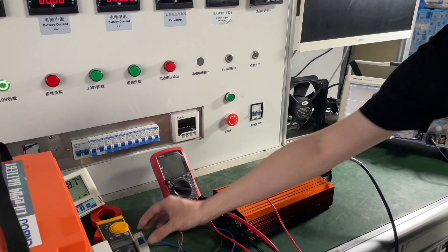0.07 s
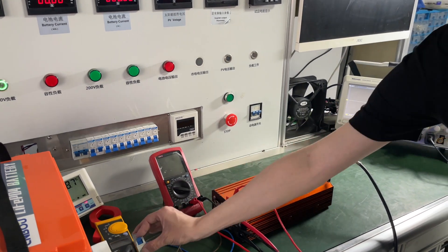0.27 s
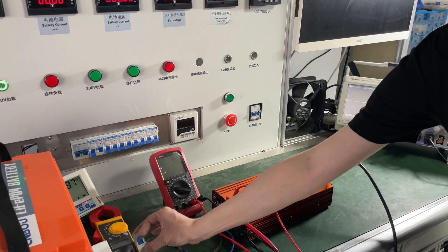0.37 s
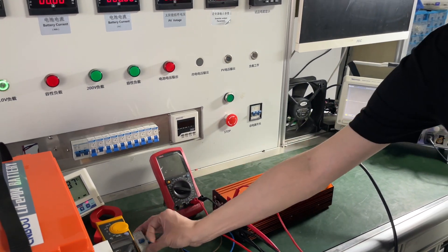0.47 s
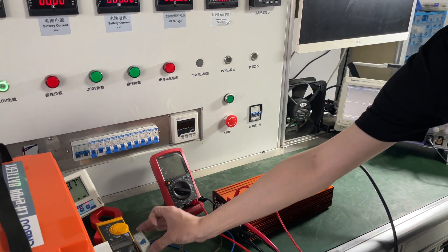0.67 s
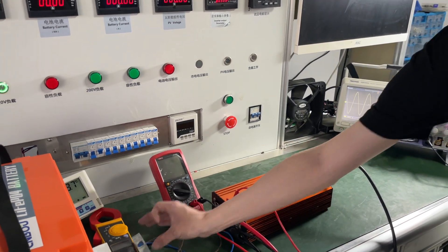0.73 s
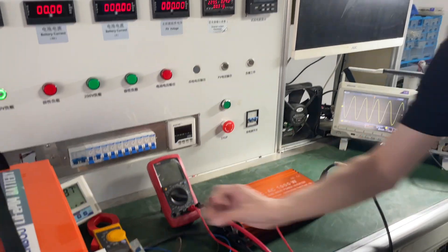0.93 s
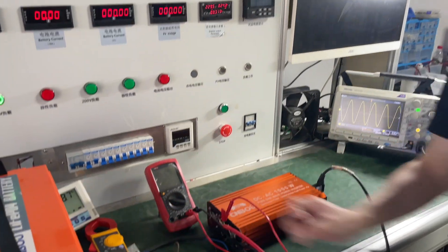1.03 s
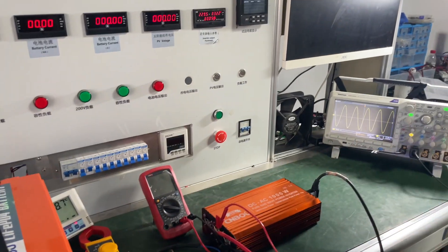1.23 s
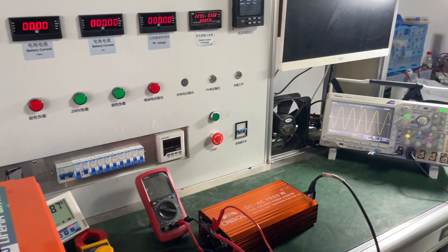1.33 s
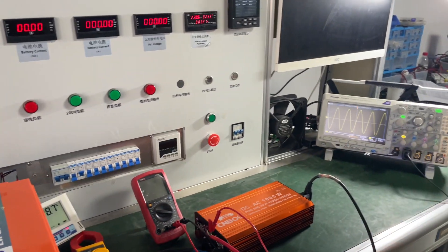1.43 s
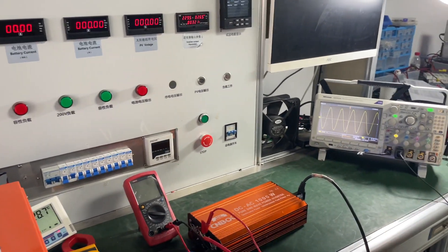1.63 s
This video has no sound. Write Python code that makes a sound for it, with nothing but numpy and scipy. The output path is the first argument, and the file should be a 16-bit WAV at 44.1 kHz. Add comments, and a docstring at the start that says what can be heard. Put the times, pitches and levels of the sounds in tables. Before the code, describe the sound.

One loud, bright electrical contact snap with a brief ringing tail, above constant fan whine and hum.

```python
"""A sharp electric snap in a hard room, a soft bench thump under it, over whining, rushing cooling fans.
The live contact cracks seven times in 6 ms: spikes and noise bursts that ring the small parts around it.
Band-split noise makes the room's tail, damped sines the bench and the faint lingering metal.
Wandering sines make the fan whine and mains hum, flickering noise the air; shaped noise makes
a few faint far ticks and, late on, the soft brush of a sleeve."""
import sys
import numpy as np
from scipy import signal
from scipy.fft import rfft, irfft
from scipy.io import wavfile

SR = 44100
rng = np.random.default_rng(int(sys.argv[2]) if len(sys.argv) > 2 else 0)


def digitize_waveform(pressure):
    """Quantize a signal to 16-bit integers and store it at the path in sys.argv[1].

    Rows of a 2-D input are taken as channels; values are limited to [-1, 1].
    """
    field = np.atleast_2d(pressure).T
    bounded = np.clip(field, -1, 1)
    quanta = np.round(bounded * 32767).astype(np.int16)
    wavfile.write(sys.argv[1], SR, quanta)


N = 74970
TIME = np.arange(N) / SR
ROOM_START_S = .4385  # the room and the metal start here

# Cracks of the snap: [t/s, relative level/dB, left over right/dB]
CRACKS = [(.4338, -16, 0), (.4351, -1, 2), (.4356, 0, 3), (.4371, -2, 3), (.4377, -4, 3), (.4388, -8, 0),
          (.4398, -11, 0)]
# Spectrum of a crack: [f/Hz, relative density/dB per Hz]
CRACK_COLOUR = [(200, -38), (700, -6), (1400, -1), (2500, 0.5), (5000, 1), (7800, -5), (9000, 4),
                (11500, -4), (14800, -3.5), (16200, -10)]
# Left-right likeness of sound spread by the room: [f/Hz, correlation]
ROOM_LIKENESS = [(60, 0.98), (200, 0.95), (600, 0.52), (1200, 0.083), (3000, 0.16), (5500, 0.252),
                 (7000, 0.2), (8000, 0.99), (9200, 1), (10000, 0.94), (11500, 0.39), (12600, 1)]


def from_db(db):
    """Decibels to gain."""
    return 10 ** (np.asarray(db) / 20)


def rms_one(x):
    """Scale to rms 1."""
    return x / np.sqrt(np.mean(x ** 2) + 1e-20)


def at_hz(points, hz):
    """Read a table on a log-frequency axis."""
    f, value = np.transpose(points)
    return np.interp(np.log(hz), np.log(f), value)


def pan(db):
    """Left and right gains for a level difference, left over right."""
    return from_db(np.array([[db], [-db]]) / 2)


def drift(rate_hz):
    """Smooth random wander with spread 1: white noise through a double low-pass, one step per 100 samples."""
    r = np.exp(-200 * np.pi * rate_hz / SR)
    steps = rng.standard_normal(N // 100 + 1002)
    slow = signal.lfilter([1], [1, -2 * r, r * r], steps)[1000:]  # drop the filter's run-in
    return np.interp(np.arange(N) / 100, np.arange(len(slow)), rms_one(slow))


def dying(start_s, t60_s):
    """Envelope that jumps to 1 and falls 60 dB in each t60."""
    decays = np.clip((TIME - start_s) / t60_s, 0, 10)
    return (TIME >= start_s) * np.exp(-np.log(1000) * decays)


def ring(x, hz, t60_s):
    """Two-pole resonator: a unit click sets a dying sine of height 1 ringing."""
    r = np.exp(-np.log(1000) / (t60_s * SR))
    w = 2 * np.pi * hz / SR
    return signal.lfilter([0, np.sin(w)], [1, -2 * r * np.cos(w), r * r], x + 1e-18)


def click(s):
    """A unit click at a given time."""
    return 1.0 * (np.arange(N) == int(s * SR))


def noise(colour, likeness):
    """Stereo noise with a given spectrum and left-right likeness, mixed from mid and side; rms 1."""
    hz = np.maximum(np.fft.rfftfreq(N, 1 / SR), 1)
    mid, side = np.exp(2j * np.pi * rng.random((2, len(hz))))
    alike = np.clip(at_hz(likeness, hz), -1, 1)
    both = np.sqrt(1 + alike) * mid + np.sqrt(1 - alike) * side * [[1], [-1]]
    return rms_one(irfft(both * from_db(at_hz(colour, hz)) * (hz > 20), N))


def bands(x):
    """Split steady noise into overlapping half-octave bands: (centre Hz, band)."""
    hz = np.maximum(np.fft.rfftfreq(N, 1 / SR), 1)
    spectrum = rfft(x)
    centres = np.geomspace(30, 16000, 19)
    split = []
    for centre in centres:
        weight = np.interp(np.log(hz), np.log(centres), centres == centre)
        split.append((centre, irfft(spectrum * weight, N)))
    return split


def high_pass(x, edge_hz):
    """Take away the bass below an edge, 12 dB per octave."""
    return signal.sosfilt(signal.butter(2, edge_hz, "high", fs=SR, output="sos"), x)


def lead(x, table):
    """Turn the phase of the left channel against the right."""
    turn = at_hz(table, np.maximum(np.fft.rfftfreq(N, 1 / SR), 1))
    left = irfft(rfft(x[0]) * np.exp(1j * turn), N)
    return np.array([left, x[1]])


def fan_rush():
    """Air through the fans and grilles: shaped noise, flickering slightly in each band."""
    # Spectrum of the air: [f/Hz, relative density/dB per Hz]
    rush_colour = [(25, -28), (38, -7), (52, 0.5), (75, -2), (110, 0), (170, -5), (260, -0.5), (360, -9),
                   (470, -3), (620, -5), (730, -9), (950, -11), (1400, -13), (1900, -16), (2600, -18),
                   (4500, -25), (7000, -35), (8700, -42.5), (11000, -37.5), (14500, -44), (16200, -58)]
    # Stereo balance of the air: [f/Hz, left over right/dB]
    rush_balance = [(60, 3.5), (150, 0.4), (350, 4), (700, -1), (1500, 1), (4000, 1.5), (12000, 1)]
    level_db, flicker_db, flicker_hz = -43, 1.0, 21
    air = 0
    for hz, band in bands(noise(rush_colour, ROOM_LIKENESS)):
        flicker = from_db(flicker_db * drift(flicker_hz))
        air = air + band * pan(at_hz(rush_balance, hz)) * flicker
    return from_db(level_db) * air


def fan_tones():
    """Blade tones and hum: sines, each wandering a little in pitch and level."""
    # Fan tones and mains hum, before the shared level curve:
    # [f/Hz, rms level/dB, wander/Hz, flutter/dB, left over right/dB, left lead/rad]
    tones = [(428.4, -45, 1.33, 1, 6, 0.24), (857.4, -46, 2.21, 1.6, 1, 0.33),
             (471.1, -52, 2.9, 3.5, 5, 0.34), (118.6, -62.5, 4.1, 2.5, -4, 0),
             (248.4, -64.5, 3.197, 2, 4.5, 0.51), (273.6, -64, 2.2, 3, 2, 0),
             (628.7, -59.5, 3.67, 3.5, 5, 0), (771, -61, 1.9, 0.5, -1.5, 0.29), (958, -63, 3, 6, -1, 0.12),
             (1167, -67.5, 4, 2, 15, 0.17), (1286, -64.5, 3.17, 2.5, 9.5, 0.76),
             (2154, -69.5, 4.04, 5, -1, 1.07), (2545, -69.5, 4, -5, -6, 1.9)]
    # Shared level of all the tones: [t/s, level/dB]
    whine_level = [(0, 1), (.3, 0), (.85, 0.5), (1.2, -1.5), (1.5, -3), (1.7, -1.5)]
    wander_rate_hz, flutter_rate_hz = 5.96, 4.64
    out = 0
    for hz, db, wander_hz, flutter_db, side_db, ahead in tones:
        pitch_hz = hz + wander_hz * drift(wander_rate_hz)
        phase = 2 * np.pi * (np.cumsum(pitch_hz) / SR + rng.random())
        level = from_db(db + flutter_db * drift(flutter_rate_hz))
        tone = np.sqrt(2) * np.sin(phase + np.array([[ahead], [0]]))  # rms 1
        out = out + level * pan(side_db) * tone
    return out * from_db(np.interp(TIME, *np.transpose(whine_level)))


def sleeve():
    """A sleeve brushes softly as the arm draws back: faint, high noise that fades in and stays."""
    # Spectrum of the cloth: [f/Hz, relative density/dB per Hz]
    sleeve_colour = [(2000, -13), (6500, -3.5), (8500, 6), (12000, 1), (14500, -6), (16000, -18)]
    start_s, rise_s, level_db = 1.17, .1, -68
    fade_in = np.clip((TIME - start_s) / rise_s, 0, 1)
    return from_db(level_db) * fade_in * noise(sleeve_colour, ROOM_LIKENESS)


def ticks():
    """Small far contacts: short noise bursts, some thinner and softer of onset, each with a longer echo."""
    # Far ticks: [t/s, level/dB, echo level/dB, gain of the lower body/dB, rise/s]
    far_ticks = [(.175, -60, -63, -10, 0.00089), (.659, -41, -47, -10, 0.0062),
                 (1.385, -55, -49.5, 1, 0.0022), (1.555, -49.5, -61, -6.5, .001)]
    # Spectrum of a tick: [f/Hz, relative density/dB per Hz]
    tick_colour = [(1000, -15), (4000, 2.5), (5500, -5), (6700, 3), (8000, -1), (11000, -4), (13000, -8),
                   (14800, -9.5), (15800, -20)]
    tick_t60_s, echo_t60_s, split_hz = 0.032, 0.45, 8700
    hiss = noise(tick_colour, ROOM_LIKENESS)
    body = signal.sosfiltfilt(signal.butter(2, split_hz, fs=SR, output="sos"), hiss)
    out = 0
    for s, db, echo_db, body_db, rise_s in far_ticks:
        level = from_db(db) * dying(s, tick_t60_s) + from_db(echo_db) * dying(s, echo_t60_s)
        onset = np.clip((TIME - s) / rise_s, 0, 1)
        out = out + level * onset * (hiss - body + from_db(body_db) * body)
    return out


def answer(colour):
    """Reflected sound: every path repeats the whole run of cracks, which combs its spectrum."""
    combed_share = 0.46  # share of power that keeps the comb
    path = noise(colour, ROOM_LIKENESS)
    repeats = 0
    for s, db, _ in CRACKS:
        repeats = repeats + from_db(db) * np.roll(path, int(s * SR), axis=1)
    smooth = noise(colour, ROOM_LIKENESS)
    return np.sqrt(combed_share) * rms_one(repeats) + np.sqrt(1 - combed_share) * smooth


def room():
    """Clumped early reflections off bench and panels, then a tail whose treble dies first."""
    # Spectrum of the tail: [f/Hz, relative density/dB per Hz]
    room_colour = [(200, 9), (700, -3), (1400, 0.5), (1650, -12), (2000, 5.5), (2600, -1.5), (3100, 5.5),
                   (3400, -6), (3700, -0.5), (4100, -3), (4600, 2), (5400, -5.5), (6400, 2), (7300, -6),
                   (10500, -1.5), (14500, -9), (16200, -22)]
    # Decay of the tail: [f/Hz, t60/s]
    room_t60 = [(200, 0.76), (1000, 0.95), (2200, 1.02), (4500, 1.01), (7000, 0.74), (11000, 0.56),
                (15000, 0.52)]
    early_db, early_t60_s, clump_db, clumps_hz = -21, 0.2, -1, 105
    tail_db, patch_db, patches_hz = -30.5, 1, 28
    clumps = from_db(early_db + clump_db * drift(clumps_hz))
    early = clumps * answer(CRACK_COLOUR) * dying(ROOM_START_S, early_t60_s)
    tail = 0
    for hz, band in bands(answer(room_colour)):
        patches = from_db(patch_db * drift(patches_hz))
        tail = tail + band * dying(ROOM_START_S, at_hz(room_t60, hz)) * patches
    # the snap sends little bass into the room
    return pan(0.88) * high_pass(early + from_db(tail_db) * tail, 218)


def metal():
    """Thin metal rings on faintly: dying sines, scattered in phase between the sides by the room."""
    # Metal modes: [f/Hz, peak level/dB, t60/s]
    metal_modes = [(1880, -33.5, 0.19), (2116, -39, 0.48), (2930, -41.5, 0.35), (3450, -46, 0.5),
                   (4920, -49, .48), (6080, -51, .45), (8850, -50, .3), (9776, -38, .3), (12720, -45, 0.43),
                   (13400, -56, .35)]
    out = 0
    for hz, db, t60_s in metal_modes:
        unlike = 1 - np.clip(at_hz(ROOM_LIKENESS, hz), 0, 1)
        cycles = hz * TIME + rng.random((2, 1)) * unlike
        out = out + from_db(db) * dying(ROOM_START_S, t60_s) * np.sin(2 * np.pi * cycles)
    return out


def bench():
    """Soft knocks, band-limited clicks, drive the low modes of the bench top; the last reaches deepest."""
    # Knocks on the bench: [t/s, click level/dB, low edge/Hz]
    thumps = [(.4400, -26, 140), (0.469, -29, 206), (0.4742, -26, 140), (.4860, -35, 41)]
    # Modes of the bench top: [f/Hz, gain/dB, t60/s]
    bench_modes = [(76, -24, 0.1), (160, -2.5, 0.045), (200.6, -3.5, 0.094), (326, -4.5, 0.055),
                   (376, -25, 0.013)]
    soft_hz = 640  # upper edge of every knock
    knocks = 0
    for s, db, low_hz in thumps:
        soften = signal.butter(2, [low_hz, soft_hz], "band", fs=SR, output="sos")
        knocks = knocks + signal.sosfilt(soften, from_db(db) * click(s) + 1e-18)
    ringing = sum(from_db(db) * ring(knocks, hz, t60_s) for hz, db, t60_s in bench_modes)
    return -pan(1.1) * ringing


def snap():
    """Each crack is a pressure spike, a noise burst dying in 5 ms and a kick to the parts around it."""
    # Small parts that ring: [f/Hz, gain/dB, t60/s]
    parts = [(1350, -29.5, 0.031), (1940, -22, 0.058), (2180, -22, 0.025), (2933, -20, 0.034),
             (3437, -21.5, 0.045), (4650, -21, 0.017), (5970, -27, 0.0067), (6550, -29, 0.051),
             (9500, -19, .014), (12300, -35, 0.0099), (14300, -29, 0.025)]
    # Left-right likeness of the bursts: [f/Hz, correlation]
    snap_likeness = [(300, 0.48), (1000, 0.48), (2000, 0.23), (4500, 0.2), (7000, 0.27), (8500, 1),
                     (11000, 0.96), (15000, .98)]
    # The snap lies to the left: [f/Hz, left lead/rad]
    snap_lead = [(100, -1.42), (1000, 0.97), (2000, .7), (3000, 2.1), (3800, 2), (4500, 1.1), (6000, 0.15)]
    spike_db, burst_db, burst_t60_s = -7, -9.5, 0.0054
    bursts = spikes = 0
    for s, db, side_db in CRACKS:
        gain = from_db(db) * pan(side_db)
        bursts = bursts + gain * dying(s, burst_t60_s)
        spikes = spikes + gain * click(s)
    out = from_db(spike_db) * spikes + from_db(burst_db) * bursts * noise(CRACK_COLOUR, snap_likeness)
    for hz, part_db, t60_s in parts:
        kicks = 0
        for s, db, side_db in CRACKS:
            kicks = kicks + from_db(db) * pan(side_db) * rng.choice([-1, 1]) * click(s)
        out = out + from_db(part_db) * ring(kicks, hz, t60_s)
    return lead(high_pass(out, 520), snap_lead)


def scene():
    """The snap and its room over the running equipment."""
    background = fan_rush() + fan_tones() + sleeve() + ticks()
    return background + room() + metal() + bench() + snap()


def record(dry):
    """The treble's phase turns between left and right, peaks are rounded and the top is cut."""
    # Phase between the channels: [f/Hz, left lead/rad]
    channel_lead = [(100, 0), (800, .5), (1400, 0), (5000, .6), (6700, -.9), (7500, -2.7), (8000, -3.12),
                    (9300, -3.17), (10000, -3.9), (11000, -4.7), (12600, -6.28)]
    peak_limit, cutoff_hz = .85, 16000
    rounded = peak_limit * np.tanh(lead(dry, channel_lead) / peak_limit)
    top_cut = signal.ellip(10, .1, 80, cutoff_hz, fs=SR, output="sos")
    return signal.sosfilt(top_cut, rounded)


dry = scene()
out = record(dry)
digitize_waveform(out)
```